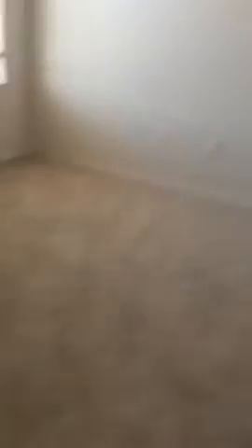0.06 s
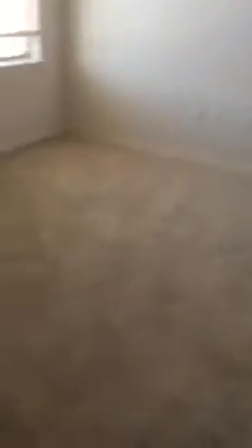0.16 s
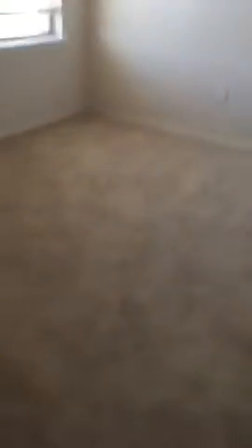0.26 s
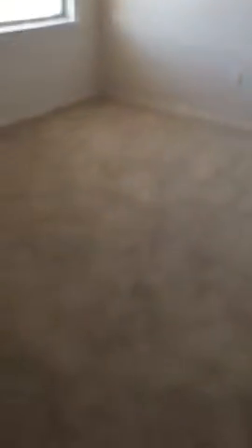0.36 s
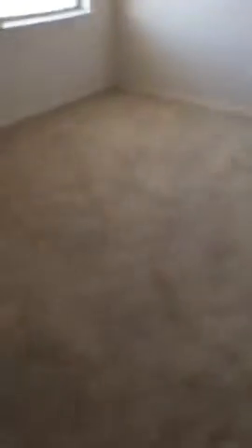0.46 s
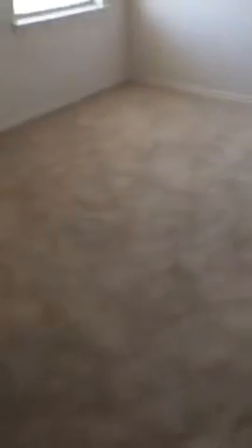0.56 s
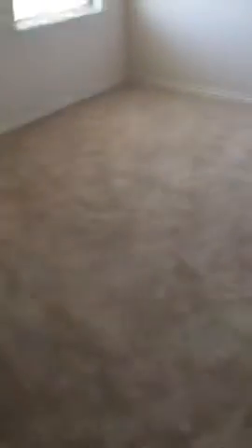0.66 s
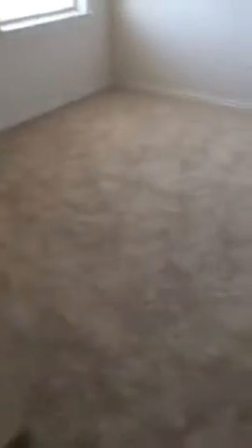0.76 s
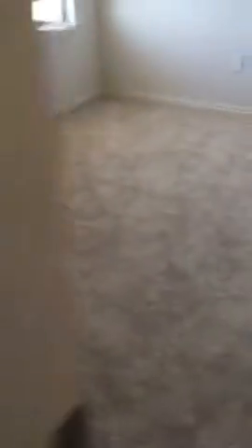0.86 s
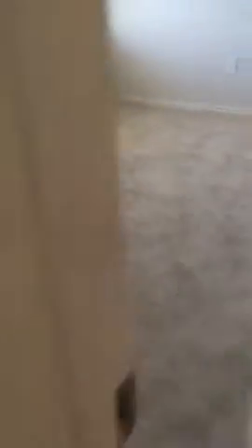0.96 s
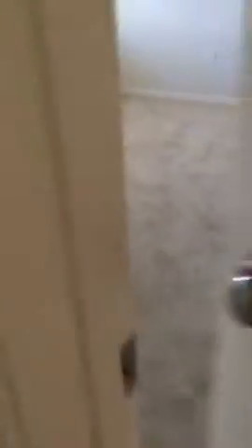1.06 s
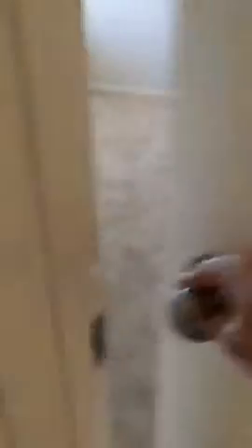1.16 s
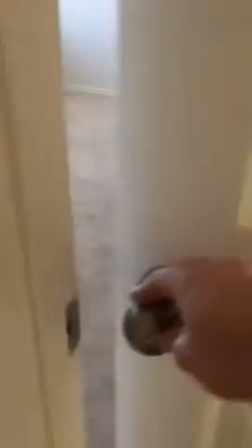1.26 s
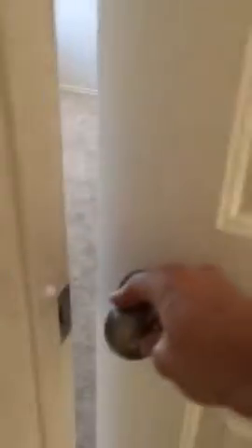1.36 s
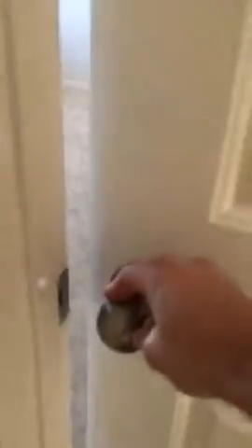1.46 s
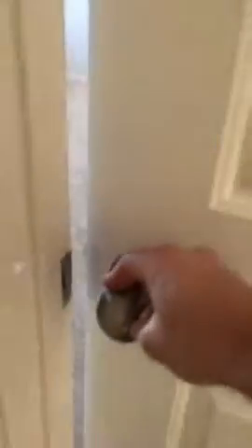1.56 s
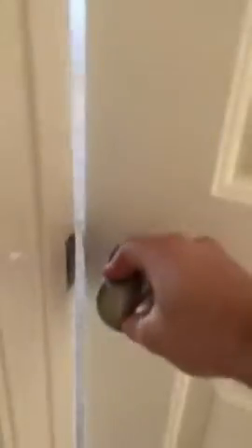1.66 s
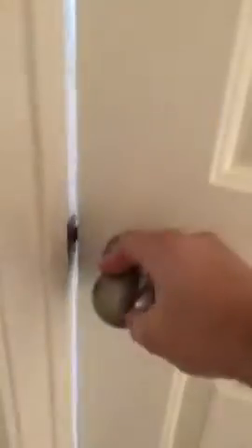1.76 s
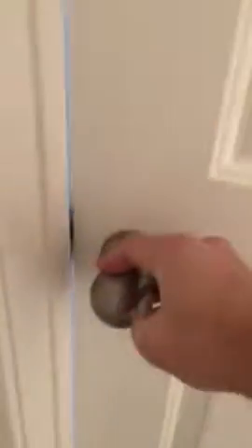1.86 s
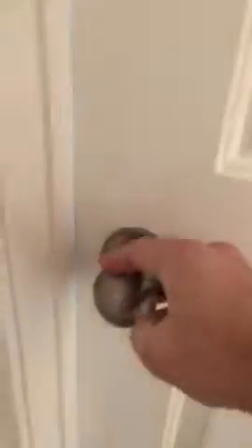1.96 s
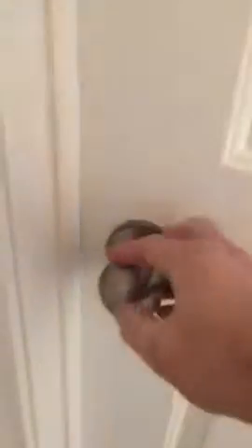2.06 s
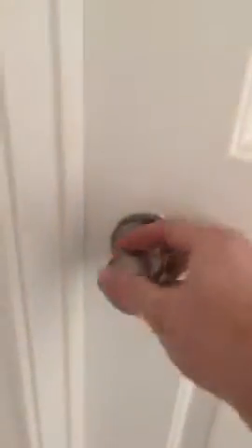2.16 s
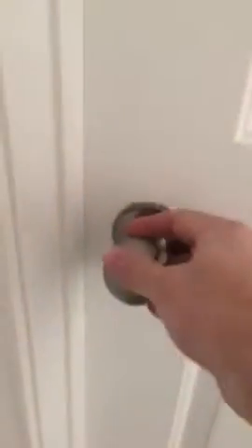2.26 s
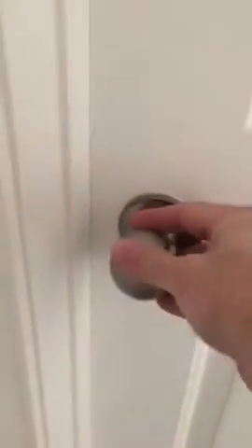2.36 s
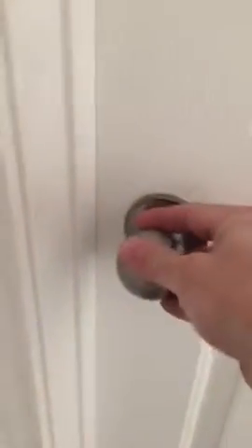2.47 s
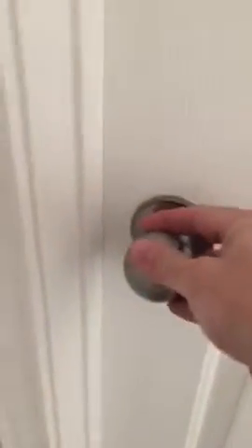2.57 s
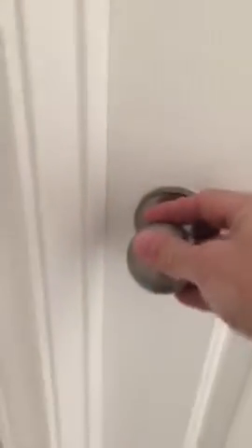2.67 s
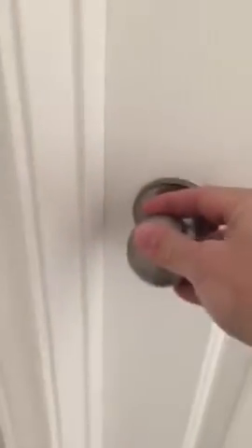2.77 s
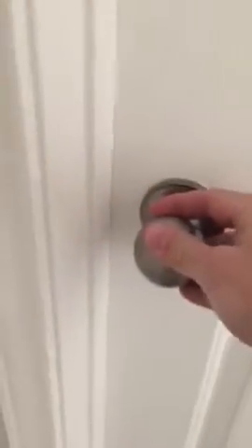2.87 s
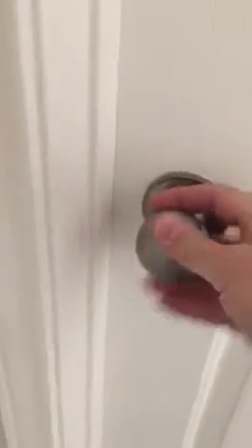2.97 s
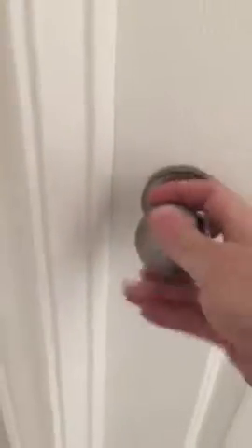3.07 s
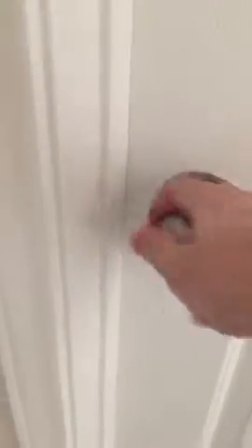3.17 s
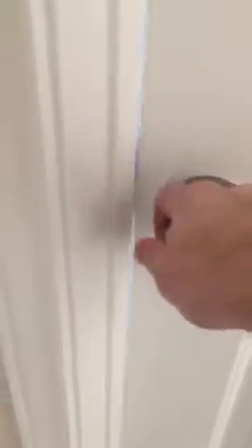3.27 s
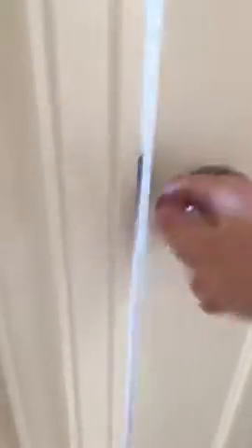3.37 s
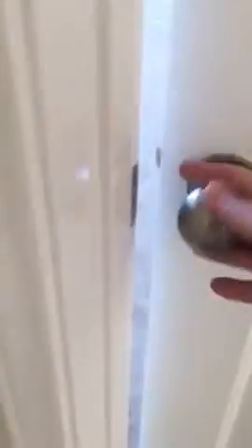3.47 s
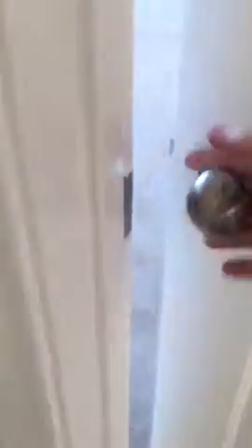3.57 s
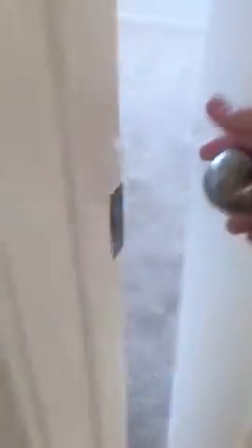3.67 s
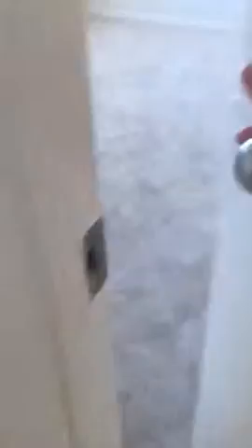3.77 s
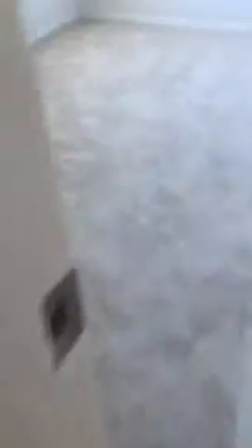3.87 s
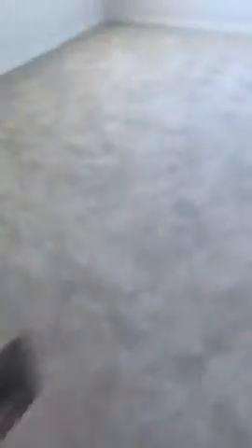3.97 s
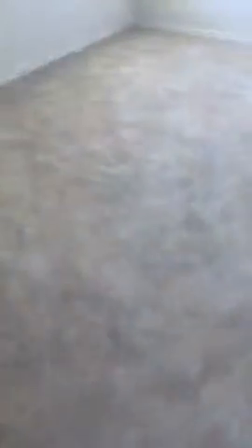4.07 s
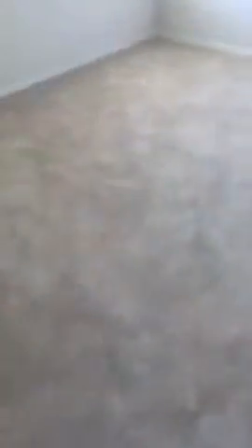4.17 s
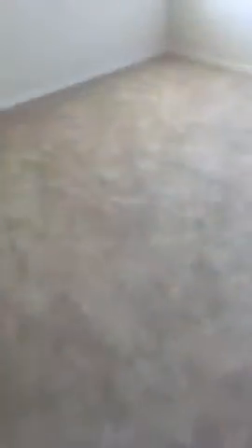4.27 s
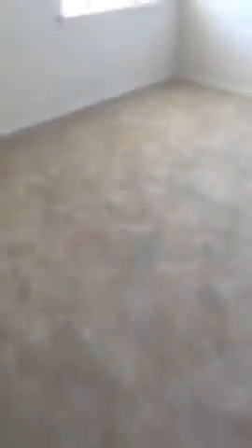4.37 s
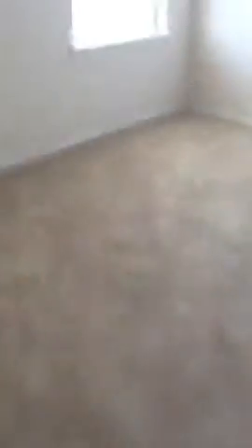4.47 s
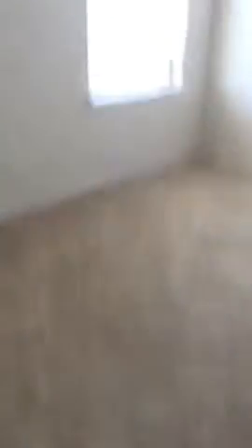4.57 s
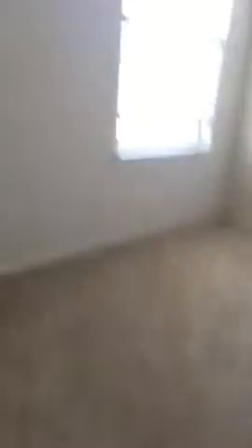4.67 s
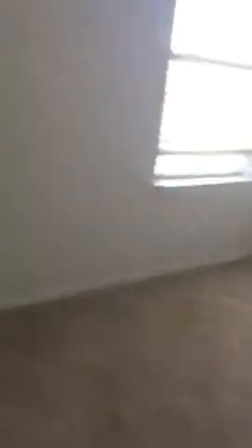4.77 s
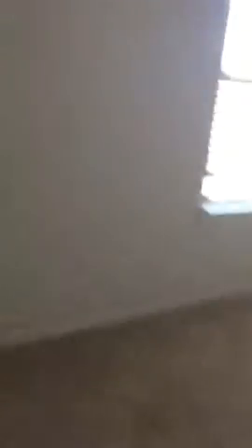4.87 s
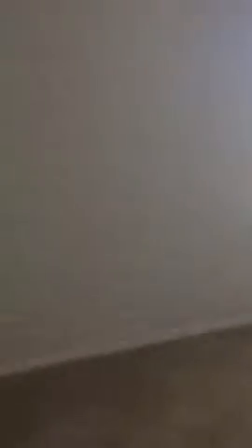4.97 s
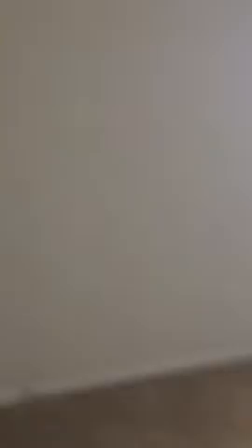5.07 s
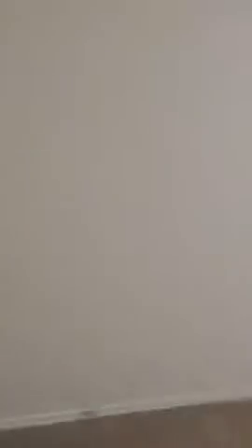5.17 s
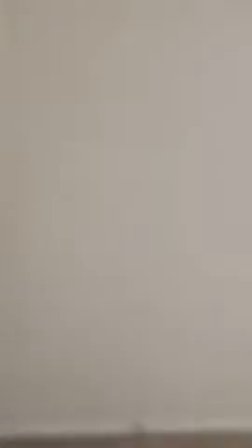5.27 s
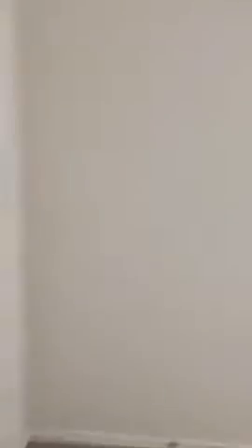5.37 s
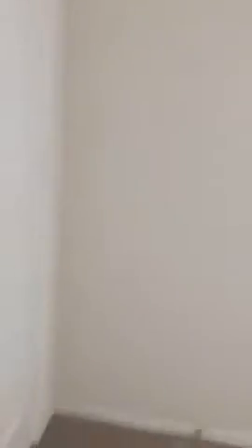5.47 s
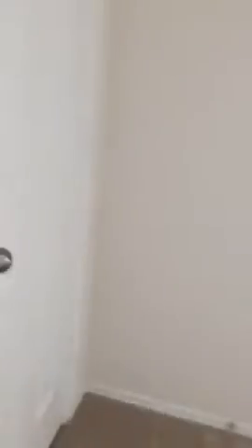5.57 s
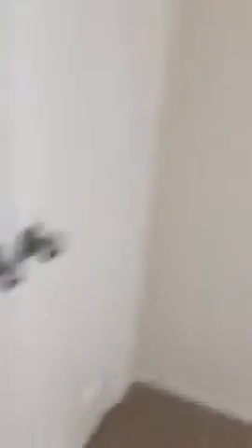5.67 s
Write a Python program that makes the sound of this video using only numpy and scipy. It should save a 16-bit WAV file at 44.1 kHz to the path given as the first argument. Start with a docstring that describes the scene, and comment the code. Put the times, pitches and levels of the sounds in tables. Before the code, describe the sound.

A few dull bumps sound, then a hollow wooden door swishes over carpet. Its spring bolt cracks against the metal plate, squeaks and snaps home as the panel booms shut. The door is tugged twice, the loose knob clicking and grating, then the latch releases. A hollow double clack, rustling clothes and soft carpeted footsteps follow. The microphone is close to the knob, bare walls echo the knocks, and an appliance hums faintly.

```python
"""A hollow door swings shut in an empty carpeted room, is tugged twice against its latch, then opens.
Its spring bolt meets the metal plate in the frame, squeaks over it and snaps home as the wooden
panel booms against the stop; the loose knob clicks and grates. Soft steps thud on the floor,
clothes rustle, an appliance hums faintly, and the bare walls echo the knocks and rubs."""
import sys
import numpy as np
from scipy import signal
from scipy.fft import rfft, irfft
from scipy.io import wavfile
from scipy.ndimage import uniform_filter1d

SR = 44100
rng = np.random.default_rng(int(sys.argv[2]) if len(sys.argv) > 2 else 0)


def generate_wav(sig):
    """Save sig (samples, or channels by samples) to the path in sys.argv[1] as 16-bit PCM at SR."""
    pcm = np.round(np.clip(np.atleast_2d(sig).T, -1, 1) * 32767).astype(np.int16)
    wavfile.write(sys.argv[1], SR, pcm)


N = 252252
RING = 32768  # samples set aside for one hit to ring out
AGE, TIME = np.arange(RING) / SR, np.arange(N) / SR  # seconds since a hit, and since the start

# The panel's blows on the stop or bolt, with their rebounds. A fade is the time to fall by 60 dB.
# (time [s], level [dB], bass [dB], brightness [dB], fade from the hand's damping [s])
PANEL_BLOWS = [(1.926, -25, -9, -6, 0.95), (2.084, -16, -15, -10, 1), (2.092, -11.5, -0.5, -11, 0.65),
               (2.103, -16, 6.5, -8, 0.7), (2.159, -18, 3.5, -2.5, 1.2), (2.183, -24, -7.5, -10, 1),
               (2.206, -24, 10.5, -18, 0.27), (2.2444, -29.5, -16, -3, 1.09), (2.305, -31, -5, -19, 1.9),
               (2.382, -31, 8.5, -14, 1.75), (2.659, -20.5, -1, -20, 0.55), (2.721, -28, -6, -19.5, 0.63),
               (2.747, -34.5, 23, -23, 1.9), (2.941, -23.5, 0, -18, 0.75), (3.0, -26, -0.5, -20.5, 1.2),
               (3.027, -35.5, 8, -16, 2.4), (3.382, -40.5, -6, -29, 4.7), (3.454, -41, -11, -34, 3.1)]
# The dull ring of the house's woodwork: (pitch [Hz], level [dB per Hz], fade [s])
WOODWORK_BANDS = [(60.4, -9, 0.2), (134, 1, 0.68), (218, 5, 0.11), (330, -1.5, 0.31), (490, 2.5, 0.28),
                  (813, -18, 0.14), (1040, -9, 0.062), (1385, -31, 0.074), (3300, -48, 0.055),
                  (6940, -53, 0.079)]


def amp(db):
    """Turn decibels into a number to multiply a sound by."""
    return 10 ** (np.asarray(db) / 20)


def unit(x):
    """Scale a sound to an average strength (rms) of 1."""
    return x / np.sqrt(np.mean(x ** 2))


def struck(x):
    """Scale a hit so that its first fiftieth of a second has an average strength of 1."""
    return x / np.sqrt(np.mean(x[:SR // 50] ** 2))


def add(track, s, x):
    """Mix x into the track, starting at s seconds."""
    i = int(s * SR)
    track[i:i + len(x)] += x[:N - i]


def on_log(hz, points_hz, values):
    """Join points with straight lines, giving every octave the same width."""
    return np.interp(np.log(np.maximum(hz, 1)), np.log(points_hz), values)


def colour(x, spectrum):
    """Shape a sound's lows and highs by points of (pitch [Hz], level [dB])."""
    hz, db = np.transpose(spectrum)[:2]
    return irfft(rfft(x) * amp(on_log(np.fft.rfftfreq(len(x), 1 / SR), hz, db)), len(x))


def fade(seconds):
    """Die away by 60 dB in the given time."""
    return np.exp(-np.log(1000) * AGE / seconds)


def tones(table, scatter_db, tilt=lambda hz: 0, detune=0.0067):
    """A struck object rings with fading tones; each blow lands differently and changes their mix."""
    out = 0
    for k, (hz, db, fade_s) in enumerate(table):
        level = amp(db + tilt(hz) + scatter_db * rng.standard_normal())
        pitch = hz * (1 + detune * rng.standard_normal())
        out = out + level * (-1) ** k * fade(fade_s) * np.sin(2 * np.pi * pitch * AGE)
    return out


def crowd(table, tilt=lambda hz: 0):
    """Tones too many to count blur into bands of noise, each fading at its own speed."""
    freqs, out = np.fft.rfftfreq(RING, 1 / SR), 0
    centres = [row[0] for row in table]
    for (hz, db, fade_s), own in zip(table, np.eye(len(table))):
        share = on_log(freqs, centres, own) * (freqs > centres[0] / 2)
        noise = irfft(rfft(rng.standard_normal(RING)) * np.sqrt(share))
        band = noise * fade(fade_s) * (1 - np.exp(-2 * AGE * hz))  # low bands build up more slowly
        out = out + amp(db + tilt(hz)) * band * np.sqrt(share.mean() / np.sum(band ** 2))
    return out


def grit(n, per_s, spread_db):
    """Scatter tiny contacts of uneven size over n samples."""
    touches = rng.random(n) < per_s / SR
    return touches * rng.standard_normal(n) * amp(spread_db * rng.standard_normal(n))


def wander(n, size):
    """A smooth random wobble; a larger size makes it slower."""
    return unit(uniform_filter1d(uniform_filter1d(rng.standard_normal(n), size=size), size=size))


def chatter(db, per_s, fade_s):
    """A loose part makes one firm contact, then a dying burst of bounces."""
    contacts = grit(RING, per_s, spread_db=0) * fade(fade_s)
    contacts *= amp(db) / np.sqrt(per_s * fade_s / (2 * np.log(1000)))  # db is for the whole burst
    contacts[0] = 1
    return contacts


def rubs(table, spectrum):
    """Soft surfaces slide past each other in short swells of tiny catches."""
    level = sum(amp(db) * np.exp(-(2 * (TIME - s) / length) ** 2) for s, db, length in table)
    return level * unit(colour(grit(N, per_s=6600, spread_db=0.5), spectrum))


def house(air_db=-67.5, shut_db=-12):
    """Still air, and an appliance's hum that drops as the door closes it off and then stays low."""
    # The appliance's tones: (pitch [Hz], level [dB])
    hum_tones = [(107.7, -68.5), (211, -69)]
    # The air is softer behind the shut door, louder inside the room: (time [s], level change [dB])
    air_changes = [(0, 1.5), (1.3, -1), (3.1, 0), (3.7, 3), (4.5, 1), (5.7, 4)]
    # The air's tone colour: (pitch [Hz], level [dB per Hz])
    air_colour = [(15, -38), (25, -30), (76, -3.5), (97, -11), (175, -14), (212, -10), (249, -18.5),
                  (451, -22.5), (1020, -25.5), (1100, -27), (2110, -25), (12500, -38.5), (16000, -37)]
    hum = sum(amp(db) * np.sqrt(2) * np.sin(2 * np.pi * hz * TIME) for hz, db in hum_tones)
    air_level = amp(air_db + np.interp(TIME, *np.transpose(air_changes)))
    air = air_level * unit(colour(rng.standard_normal(N), air_colour))
    return air + hum * amp(np.interp(TIME, [1.65, 1.95], [0, shut_db]))


def taps(body_db=-2, ring_db=-5, ring_fade_s=0.0125):
    """Handling makes light hollow taps, each with its own brief ring over a woody body."""
    # The taps: (time [s], level [dB], pitch of the ring [Hz], bass [dB])
    hits = [(.047, -59.5, 1620, 1), (.133, -55, 2715, -5), (.344, -66.5, 2730, -10), (.775, -66, 1480, -2),
            (0.967, -60.5, 1720, -0.5), (1.69, -56.5, 1340, 9)]
    # Their hollow body: (pitch [Hz], level [dB per Hz], fade [s])
    body_bands = [(300, -3, .1), (795, 3, 0.078), (1240, 2.5, 0.058), (1700, -4, 0.039), (2715, -14, 0.033),
                  (4130, -23.5, 0.029), (8900, -26.5, .02)]
    out = np.zeros(N)
    for s, db, ring_hz, bass_db in hits:
        body = struck(crowd(body_bands, lambda hz: on_log(hz, [500, 1200], [bass_db, 0])))
        tone = fade(ring_fade_s) * np.sin(2 * np.pi * ring_hz * AGE)
        ring = struck(signal.fftconvolve(body, tone)[:RING])
        add(out, s, amp(db) * (amp(body_db) * body + amp(ring_db - bass_db / 2) * ring))
    return out


def thud(hz, length, low_slope_db=5, high_slope_db=14):
    """Carpet softens a step to a few low swings of the floor."""
    octaves = np.log2(np.maximum(np.fft.rfftfreq(RING, 1 / SR), 1) / hz)
    shape_db = np.where(octaves < 0, low_slope_db * octaves, -high_slope_db * octaves ** 2)
    boom = irfft(rfft(rng.standard_normal(RING)) * amp(shape_db))
    boom *= (AGE / length) ** 2 * np.exp(-6 * AGE / length)
    return boom * np.sqrt(length * SR / np.sum(boom ** 2))


def footsteps(heel_hz=62, sole_hz=111.4, roll_s=0.062, floor_db=-3):
    """Each step lands on the heel and rolls on to the sole; the floor rumbles on afterwards."""
    # Steps on the carpet: (time [s], heel level [dB], sole level [dB], thud length [s])
    steps = [(0.073, -46, -51, 0.11), (1.022, -92, -52.5, 0.14), (3.843, -47, -49.5, 0.065),
             (4.058, -34.5, -34, 0.073), (4.222, -44.5, -45, 0.051), (4.295, -44, -68.5, 0.063),
             (4.423, -47.5, -80, 0.065), (4.856, -57, -54.5, 0.056), (5.375, -52.5, -63.5, 0.058)]
    # The floor's boom: (pitch [Hz], level [dB per Hz], fade [s])
    floor_bands = [(40, 4, .35), (74.4, 6.5, 0.17), (152, -8, 0.36), (243, -15.5, 0.3), (400, -43.5, 0.29)]
    out = np.zeros(N)
    for s, heel_db, sole_db, length in steps:
        add(out, s, amp(heel_db) * thud(heel_hz, length))
        add(out, s + roll_s, amp(sole_db) * thud(sole_hz, length, high_slope_db=11.5))
        add(out, s + length / 2, amp(heel_db + floor_db) * struck(crowd(floor_bands)))
    return out


def far_bumps(settle_s=0.014, settle_db=-2):
    """Wood knocks dully elsewhere in the house and settles with a second, softer knock."""
    # The bumps: (time [s], level [dB])
    hits = [(.098, -33), (0.132, -55), (.17, -43), (5.697, -47.5)]
    out = np.zeros(N)
    for s, db in hits:
        add(out, s, amp(db) * struck(crowd(WOODWORK_BANDS)))
        add(out, s + settle_s, amp(db + settle_db) * struck(crowd(WOODWORK_BANDS)))
    return out


def cloth_brushes():
    """Cloth brushes over cloth with a light, high hiss."""
    # The brushes: (middle time [s], level [dB], length [s])
    strokes = [(.35, -72.5, .1), (2.39, -63.5, 0.045), (4.3, -67.5, 0.13)]
    # Their tone colour: (pitch [Hz], level [dB per Hz])
    brush_colour = [(2000, -8), (4600, 1), (7000, -13), (10500, -4), (13500, -2), (16000, -11.5)]
    return rubs(strokes, brush_colour)


def patchy(x, count=14, depth_db=2.8):
    """Narrow bands of a rub come and go on their own as the contact shifts."""
    centres = np.geomspace(500, 9000, count)
    spectrum, freqs = rfft(x), np.fft.rfftfreq(N, 1 / SR)
    bands = (irfft(spectrum * on_log(freqs, centres, own), N) for own in np.eye(count))
    return sum(band * amp(depth_db * wander(N, size=700)) for band in bands)


def door_swing(trim_db=-2, fibre_db=-6, swish_db=-4.5, flutter_hz=550, bright_hz=2000, dull_hz=1200):
    """The door's lower edge brushes the carpet; a low rub turns into a swish that sinks as it slows."""
    # The swing: (time [s], level before the trim [dB], centre of the swish [Hz])
    path = [(1.029, -73, 1354), (1.066, -58, 674), (1.121, -47, 624), (1.146, -53, 681),
            (1.204, -52.5, 2037), (1.231, -49.5, 2179), (1.339, -49.5, 1772), (1.399, -53.5, 1421),
            (1.44, -76.5, 1328)]
    # The rubbed carpet's tone colour: (pitch [Hz], level [dB per Hz])
    carpet_colour = [(59, -43.5), (100, -11), (150, -2), (193, -12), (520, -17), (691, -12.5), (850, -22),
                     (1450, -17.5), (2100, -13.5), (2690, -18), (3190, -15.5), (16000, -37.5)]
    s, db, swish_hz = np.transpose(path)
    centre_hz = np.interp(TIME, s, swish_hz)
    friction = rng.standard_normal(N) + amp(fibre_db) * unit(grit(N, per_s=2000, spread_db=-0.5))
    fibres = colour(friction, carpet_colour)
    dull = signal.sosfilt(signal.butter(1, dull_hz, fs=SR, output="sos"), fibres)
    rub = unit(patchy(dull + centre_hz / bright_hz * (fibres - dull)))  # brighter when faster
    flutter = signal.sosfilt(signal.butter(2, flutter_hz, fs=SR, output="sos"), rng.standard_normal(N))
    swish = unit(flutter * np.sin(2 * np.pi * np.cumsum(centre_hz) / SR))
    moving = (TIME > s[0]) & (TIME < s[-1])
    return moving * amp(trim_db + np.interp(TIME, s, db)) * (rub + amp(swish_db) * swish)


def bolt(strike_s=1.9248, strike_db=-26.5, ring_db=-1):
    """The bolt's tip cracks against the plate; past it, the spring shoots the bolt home."""
    # The plate's hard first snap: (pitch [Hz], level [dB], fade [s])
    plate_tones = [(2914, 1.5, .004), (6386, -4.5, 0.0033), (11800, -13, .002), (15600, -9.5, .002)]
    # The plate's short ring: (pitch [Hz], level [dB per Hz], fade [s])
    plate_bands = [(1190, -10, .04), (2186, -1, .045), (3000, 1, .04), (3930, -9, .04), (4452, -6, .04),
                   (5200, -15, .04), (6200, -10.5, .04), (8500, -23.5, .02), (15000, -32.5, .02)]
    # The bolt shooting home: (time [s], level [dB])
    home_hits = [(2.074, -40.5), (2.0855, -25), (2.093, -29.5)]
    # The ring of the barrel it slides in: (pitch [Hz], level [dB], fade [s])
    barrel_tones = [(1771, -1, .07), (1850, -5, .04), (1928, 0, .07), (1990, -1, .07), (2132, -6, .07),
                    (3128, -10, .06), (3763, -7, .05)]
    out = np.zeros(N)
    crack = struck(tones(plate_tones, scatter_db=2.5))
    add(out, strike_s, amp(strike_db) * (crack + amp(ring_db) * struck(crowd(plate_bands))))
    for s, db in home_hits:
        add(out, s, amp(db) * struck(tones(barrel_tones, scatter_db=0.5)))
    return out


def panel(bass_db, bright_db, ring_db=-2, skin_db=-4):
    """The hollow door knocks and booms; a harder contact brings out its higher tones."""
    # The panel's main tones: (pitch [Hz], level [dB], fade [s])
    panel_tones = [(62, 0, .7), (81, -5, .55), (129, -5, .5), (165, 0, .45), (285, -1, .4), (426, -13, .3),
                   (495, -12, .3), (602, -9, .35), (712, -11, .36), (795, -9, .3), (857, -13, .4),
                   (902, -12, .4), (1012, -12, .22), (1076, -12, .28), (1297, -17, .22)]
    # Its many weaker tones: (pitch [Hz], level [dB per Hz], fade [s])
    wood_bands = [(35.8, -5, 0.37), (69, 3.5, 0.95), (152, 2, 1), (250, -6, 0.69), (428, -16.5, 0.82),
                  (640, -7, 0.1), (1050, -14.5, 0.16), (1987, -36.5, 0.048), (3970, -50.5, .04),
                  (8300, -67.5, .03)]
    # The short knock as its thin skin gives: (pitch [Hz], level [dB], fade [s])
    skin_tones = [(363, 5, 0.056), (620, -1, 0.071), (796, -0.5, .05), (1019, -3, 0.044), (1277, -8.5, .03)]
    tilt = lambda hz: on_log(hz, [70, 180, 330, 900], [bass_db, 0, 0, bright_db])
    skin = amp(skin_db + bright_db / 2) * struck(tones(skin_tones, scatter_db=3, detune=0.03))
    ring = amp(ring_db) * struck(tones(panel_tones, scatter_db=4.5, tilt=tilt))
    return struck(ring + struck(crowd(wood_bands, tilt)) + skin)


def door_knocks(kept_share=0.22, grip_fade_s=0.28, first_db=-4, first_fade_s=0.25):
    """The panel bumps and rebounds; each new contact soaks up part of the earlier ringing."""
    out = np.zeros(N)
    for s, db, bass_db, bright_db, hand_fade_s in PANEL_BLOWS:
        gripped = 1 - np.exp(-np.log(1000) * np.maximum(TIME - s, 0) / grip_fade_s)
        out *= 1 - (1 - kept_share) * gripped
        decay = fade(hand_fade_s) + amp(first_db) * fade(first_fade_s)  # the first swings are widest
        add(out, s, amp(db) * struck(panel(bass_db, bright_db) * decay))
    return out


def latch(treble_db, ring_db=-4, crack_db=-1, crack_fade_s=0.0071):
    """A sharp metal crack, then the brief ring of bolt, plate and knob."""
    # The main tones of latch and knob, damped by the hand: (pitch [Hz], level [dB], fade [s])
    latch_tones = [(1300, -5, .08), (1775, -3, .08), (1930, -3, .07), (2010, -2, .06), (2330, -2, .06),
                   (2650, -3, .04), (2900, -3, .04), (3220, -4, .03), (3460, -6, .04), (3900, -5, .04),
                   (4400, -11, .03), (6280, -12, .025)]
    # The latch's many weaker tones: (pitch [Hz], level [dB per Hz], fade [s])
    metal_bands = [(603, -3.5, 0.16), (1340, 0.5, 0.11), (1599, 1, 0.033), (1826, 0.5, 0.025),
                   (2130, 0.5, 0.023), (2866, -7, 0.12), (3800, -1.5, 0.045), (4780, -14, 0.051),
                   (6350, -9.5, 0.038), (7250, -13, 0.0097), (11700, -20, 0.051), (14600, -26.5, 0.018)]
    tilt = lambda hz: on_log(hz, [2300, 5500], [0, treble_db])
    crack = struck(crowd([(hz, db, crack_fade_s) for hz, db, _ in metal_bands], tilt))
    ring = struck(tones(latch_tones, scatter_db=2.5, tilt=tilt))
    return struck(struck(crowd(metal_bands, tilt)) + amp(ring_db) * ring + amp(crack_db) * crack)


def bolt_jolts(jolt_db=-25.5):
    """The bolt ticks in the plate at each blow of the panel; a softer blow shakes it less."""
    out = np.zeros(N)
    for s, db, _, bright_db, _ in PANEL_BLOWS:
        add(out, s, amp(db + jolt_db + bright_db / 2) * latch(treble_db=-11))
    return out


def metal_slides(rise=0.13, roughness=0.11, judder=0.17, brighten_db=14):
    """Metal grates, sticks and slips on metal; the slips speed up and slow again, bending a squeak."""
    # The slides: (start [s], length [s], level [dB], treble [dB], squeak [dB], base slip rate [Hz])
    strokes = [(1.983, 0.098, -41, -0.5, 5.5, 1868), (2.365, 0.039, -49.5, -8.5, -12, 2450),
               (2.593, 0.071, -50, -12.5, -12, 2000), (2.898, 0.0455, -48, -11, -6.5, 1883),
               (3.196, 0.055, -45, -19, -26, 1880), (3.244, 0.081, -39, -10.5, -13, 1930),
               (3.258, 0.027, -43, -14, -6.5, 5080), (3.298, 0.084, -50.5, -13, -3.5, 1920),
               (3.527, 0.085, -44.5, -16, -7, 1917)]
    out = np.zeros(N)
    for s, length, db, treble_db, squeak_db, slip_hz in strokes:
        n = int(length * SR)
        travel = np.linspace(0, 1, n)
        waver, pressure = wander(n, size=18), wander(n, size=80)
        loose = min(1, 2000 / slip_hz) ** 2  # fast slips run steadier
        rate_hz = slip_hz * (1 + loose * (rise * np.sin(np.pi * travel) + roughness * waver))
        phase = 2 * np.pi * np.cumsum(rate_hz) / SR
        squeak = unit(sum(np.sin(k * phase) / k ** 1.3 for k in (1, 2, 3, 4) if k * slip_hz < 9000))
        grate = unit(signal.fftconvolve(grit(n, per_s=3500, spread_db=-1), latch(treble_db))[:n])
        scrape = grate + amp(squeak_db) * squeak
        treble = colour(scrape, [(2500, -30), (5500, 0)])
        scrape += treble * (amp(brighten_db * (travel - 1)) - 1)  # brighter as the spring is pressed in
        add(out, s, amp(db) * signal.windows.tukey(n, 0.5) * unit(np.exp(judder * pressure)) * scrape)
    return out


def latch_clicks(rattle_fade_s=0.069, board_fade_s=0.74):
    """Metal parts snap together and chatter; the panel, damped by the hand, sounds along with them."""
    # Bolt, spindle and knob contacts: (time [s], level [dB], treble [dB], share for the panel [dB])
    hits = [(2.074, -34, -9.5, -23), (2.0841, -24.5, -12, 5), (2.0905, -23.5, -4.5, 5),
            (2.0937, -24, 1, 4.5), (2.156, -40, -17, 12), (2.188, -41, -9, 11), (2.613, -52, -7.5, 14),
            (2.739, -43, -12.5, 6.5), (2.7478, -38, -12.5, 2.5), (2.916, -48.5, -8.5, 13.5),
            (3.028, -47, -16, -1), (3.1, -63.5, -1, 14.5), (3.208, -46, -28, 10), (3.263, -45.5, -12, 10),
            (3.283, -37.5, -11, -1.5), (3.295, -32.5, 7, -8), (3.345, -43.5, -10, 6.5),
            (3.486, -50, -4, 9.5), (3.563, -34.5, -2.5, -4.5), (3.5829, -31.5, -7.5, -7),
            (3.591, -40.5, -16, 3), (3.978, -53.5, -17, 5), (4.009, -44, -20, 5)]
    # The first instant of bare metal on metal: (pitch [Hz], level [dB], fade [s])
    snap_tones = [(2960, 19, 0.0026), (6500, 13, 0.0023), (11700, 6.5, 0.0058)]
    out = np.zeros(N)
    for s, db, treble_db, panel_db in hits:
        rattle_db = -3 + 0.4 * (db + 36.5)  # louder clicks rattle more
        contacts = chatter(rattle_db, per_s=2600, fade_s=rattle_fade_s)
        metal = struck(signal.fftconvolve(contacts, latch(treble_db))[:RING])
        board = panel(bass_db=-13, bright_db=-7) * fade(board_fade_s)
        snap = amp(12 * min(treble_db, 0)) * tones(snap_tones, scatter_db=3.5)  # barely there if dull
        add(out, s, amp(db) * (snap + metal + amp(panel_db) * board))
    return out


def loose_knob(tick_db=4, tick_fade_s=0.0095):
    """The knob's hollow shell rings at each tap and chatters on because it sits loosely."""
    # The knob tapping on its spindle: (time [s], level [dB])
    hits = [(2.1568, -31.5), (2.402, -48.5), (2.627, -47), (2.658, -49.5), (2.721, -53.5), (2.741, -47.5),
            (2.748, -39.5), (2.879, -61), (2.922, -45.5), (3.001, -57.5), (3.028, -50), (3.1, -59),
            (3.209, -48), (3.346, -42), (3.486, -45.5)]
    # The shell's tones, damped by the hand: (pitch [Hz], level [dB], fade [s])
    shell_tones = [(1852, -6, .04), (1992, -3, .05), (2213, -2, .05), (2330, 0, .035), (2440, -1, .03),
                   (2520, -4, .03), (2632, -6, .03), (3225, -15, .03), (3810, -15, .03)]
    out = np.zeros(N)
    for s, db in hits:
        contacts = chatter(db=-8, per_s=350, fade_s=0.04)
        shell = tones(shell_tones, scatter_db=7.5) * (1 + amp(tick_db) * fade(tick_fade_s))
        add(out, s, amp(db) * struck(signal.fftconvolve(contacts, shell)[:RING]))
    return out


def squeaks(waver=0.018, flutter_db=5):
    """Faint, very high squeaks bend, waver and break up."""
    # (start [s], length [s], level [dB], first pitch [Hz], middle pitch [Hz], last pitch [Hz])
    glides = [(2.925, .065, -76, 12300, 12800, 12500), (3.008, 0.14, -75.5, 11800, 11400, 11600),
              (5.25, 0.16, -84.5, 12300, 12800, 14030), (5.42, .19, -83.5, 13600, 12550, 13200)]
    out = np.zeros(N)
    for s, length, db, *path_hz in glides:
        n = int(length * SR)
        curve_hz = np.polyval(np.polyfit([-1, 0, 1], path_hz, 2), np.linspace(-1, 1, n))
        hz = curve_hz * (1 + waver * wander(n, size=30))
        tone = unit(np.sin(2 * np.pi * np.cumsum(hz) / SR) * amp(flutter_db * wander(n, size=120)))
        add(out, s, amp(db) * signal.windows.tukey(n, 0.5) * tone)
    return out


def sleeve_rustle():
    """Sleeve and skin slide in small uneven catches as the arm pushes the door open."""
    # The rustle's rise and fall: (time [s], level [dB])
    levels = [(3.301, -88), (3.55, -56.5), (3.7, -77), (3.85, -76), (4.001, -55.5), (4.06, -66),
              (4.22, -76), (4.31, -69.5), (4.42, -80.5)]
    # The cloth's tone colour: (pitch [Hz], level [dB per Hz])
    cloth_colour = [(300, -10), (1300, 11.5), (3000, 10), (6000, 1.5), (10000, 1), (14500, 3)]
    s, db = np.transpose(levels)
    catches = grit(N, per_s=5000, spread_db=5) * amp(2.5 * wander(N, size=350))
    moving = (TIME > s[0]) & (TIME < s[-1])
    return moving * amp(np.interp(TIME, s, db)) * unit(colour(catches, cloth_colour))


def clacks(wood_db=-5):
    """Once the door stands open, a hollow double clack chatters over a dull wooden body."""
    # The clacks: (time [s], level [dB])
    hits = [(3.977, -41.5), (4.01, -39.5)]
    # Their ring: (pitch [Hz], level [dB], fade [s])
    clack_tones = [(220, 0, .2), (345, -1, .2), (385, -1, .24), (560, -9, .15), (740, -8, .22),
                   (1060, -10, .25), (1250, -10, .25), (1530, -8, .1), (1810, -2, .1)]
    out = np.zeros(N)
    for s, db in hits:
        contacts = chatter(db=6, per_s=900, fade_s=0.1)
        ring = signal.fftconvolve(contacts, tones(clack_tones, scatter_db=4.5))[:RING]
        add(out, s, amp(db) * (struck(ring) + amp(wood_db) * struck(crowd(WOODWORK_BANDS))))
    return out


def sole_scuffs():
    """Soles drag briefly over the carpet."""
    # The scuffs: (middle time [s], level [dB], length [s])
    strokes = [(4.142, -63, 0.073), (4.716, -70.5, 0.078), (4.927, -66.5, 0.14)]
    # Their tone colour: (pitch [Hz], level [dB per Hz])
    scuff_colour = [(150, -13), (320, 5), (600, -4), (1200, -0.5), (2000, -9), (6000, -29)]
    return rubs(strokes, scuff_colour)


def scene(wall_delay_s=0.009):
    """Mix all the sounds; the bare walls echo everything but the footsteps, air and hum."""
    # The walls' echo: (pitch [Hz], level [dB per Hz], fade [s])
    echo_bands = [(95, -3.5, 0.66), (335, -10, 0.62), (600, -10.5, 0.3), (1026.5, -11, .7),
                  (1800, -22.5, 1), (2770, -14.5, 0.45), (4240, -19, 0.42), (8760, -19, 0.24),
                  (15000, -27, .2)]
    near = door_knocks() + bolt_jolts() + far_bumps() + bolt() + latch_clicks() + loose_knob()
    near = near + clacks() + taps() + sole_scuffs() + cloth_brushes()
    near = near + squeaks() + metal_slides() + door_swing() + sleeve_rustle()
    out = near + footsteps() + house()
    add(out, wall_delay_s, signal.fftconvolve(near, crowd(echo_bands))[:N])
    return out[None]


def record(dry, ceiling=0.97, bottom_hz=35, top_hz=16000):
    """Drop the deepest bass, round off the loudest peaks and cut the highest treble."""
    trimmed = signal.sosfilt(signal.butter(2, bottom_hz, "high", fs=SR, output="sos"), dry)
    rounded = ceiling * np.tanh(trimmed / ceiling)
    return signal.sosfilt(signal.ellip(8, 0.2, 70, top_hz, fs=SR, output="sos"), rounded)


dry = scene()
out = record(dry)
generate_wav(out)
```